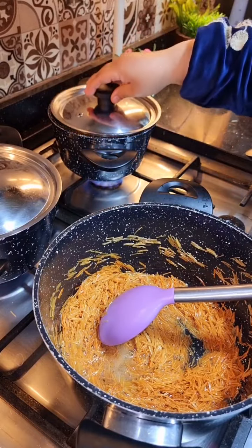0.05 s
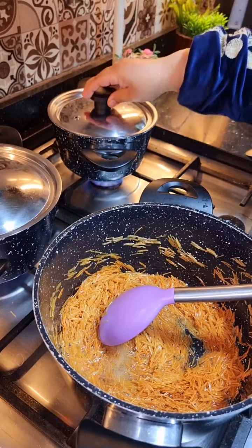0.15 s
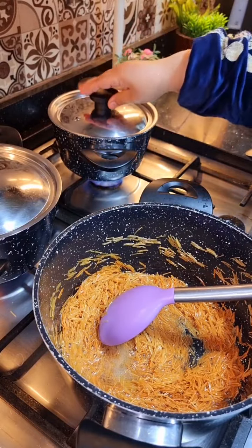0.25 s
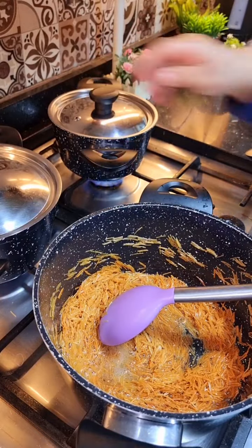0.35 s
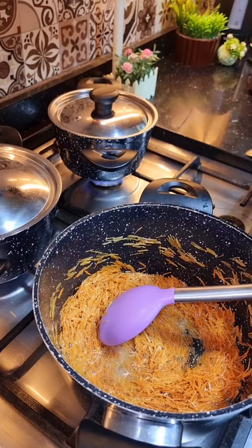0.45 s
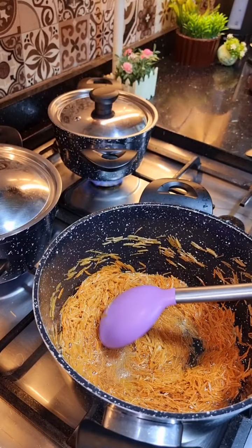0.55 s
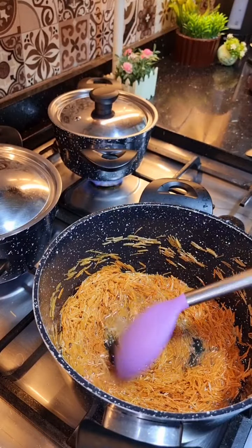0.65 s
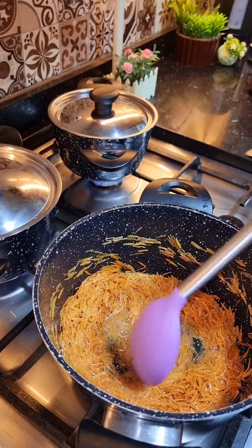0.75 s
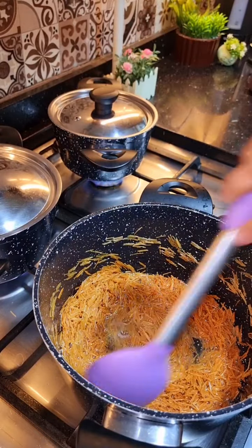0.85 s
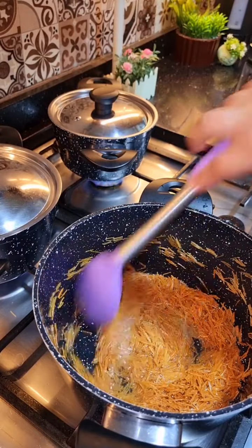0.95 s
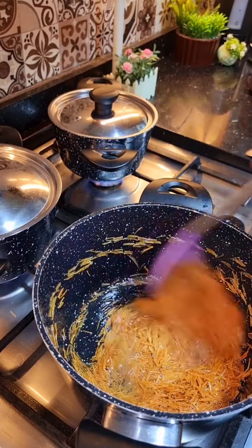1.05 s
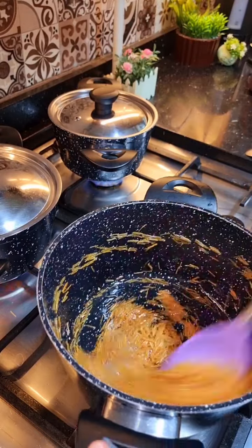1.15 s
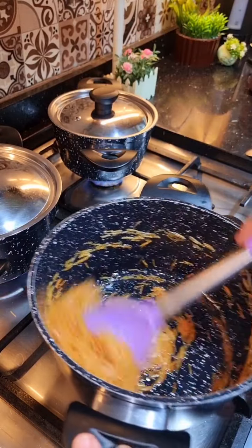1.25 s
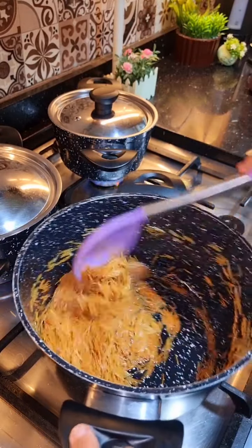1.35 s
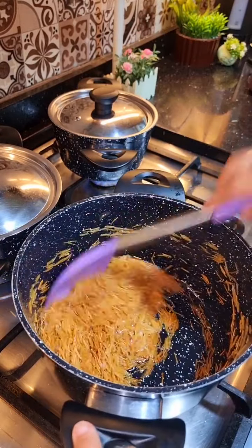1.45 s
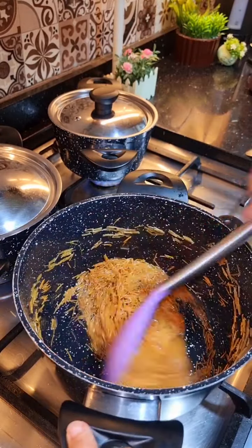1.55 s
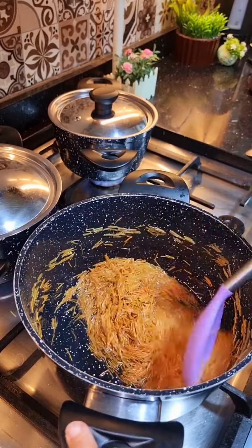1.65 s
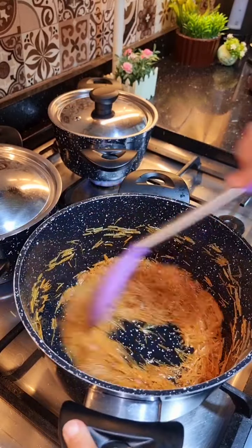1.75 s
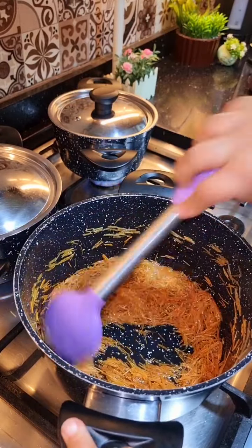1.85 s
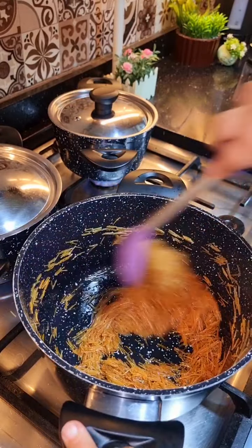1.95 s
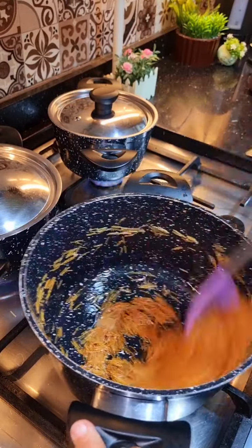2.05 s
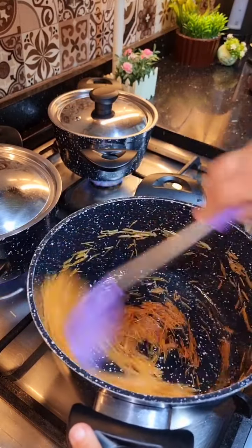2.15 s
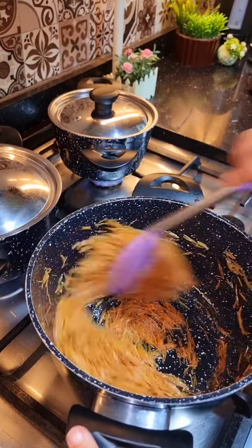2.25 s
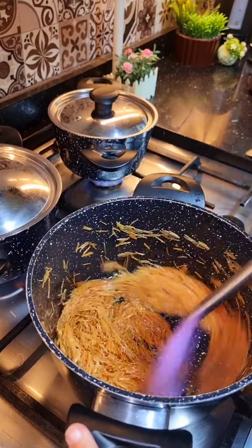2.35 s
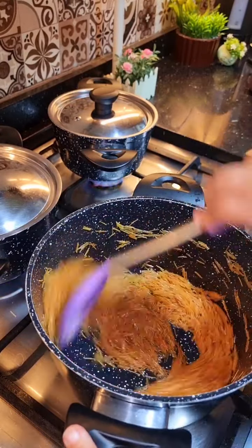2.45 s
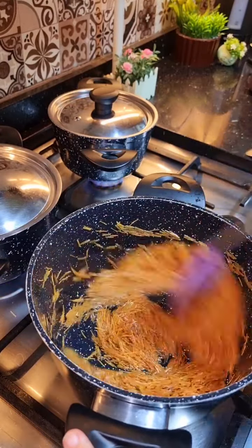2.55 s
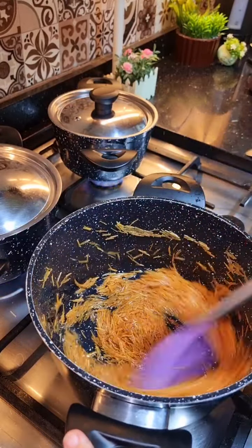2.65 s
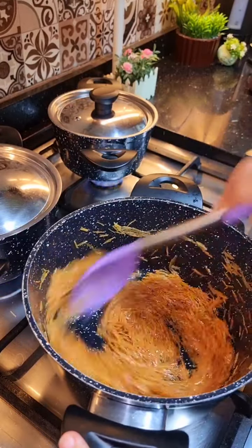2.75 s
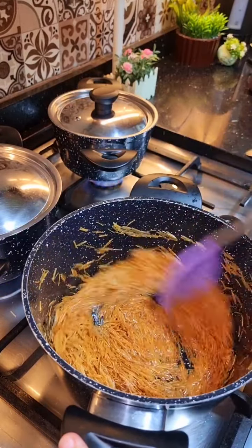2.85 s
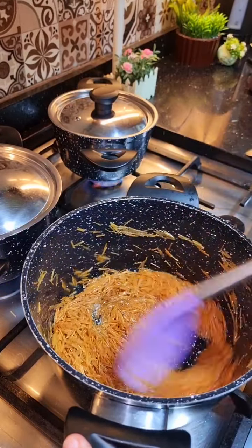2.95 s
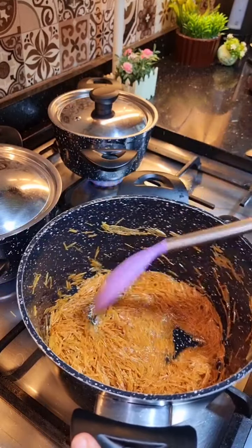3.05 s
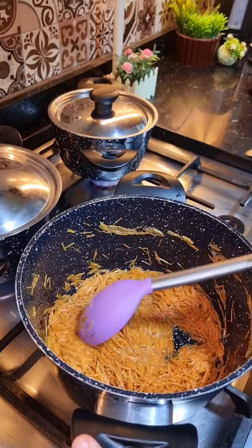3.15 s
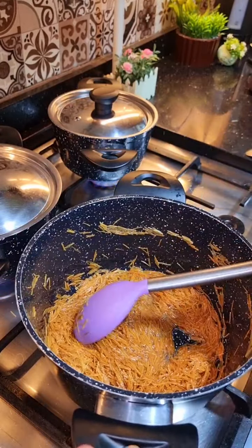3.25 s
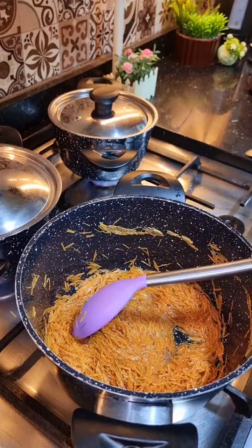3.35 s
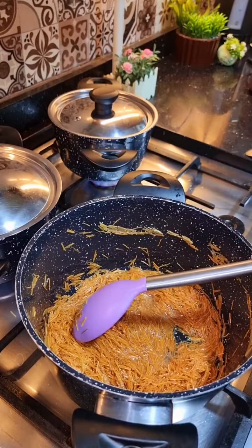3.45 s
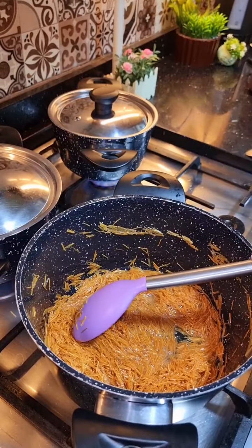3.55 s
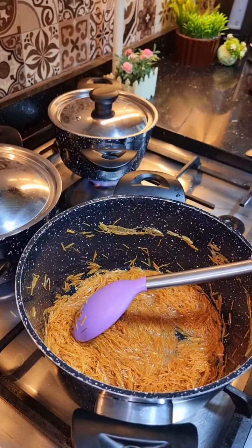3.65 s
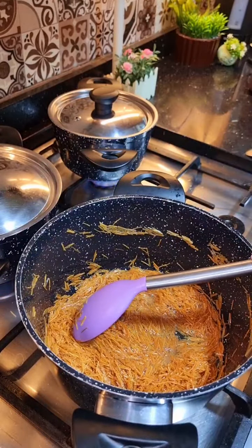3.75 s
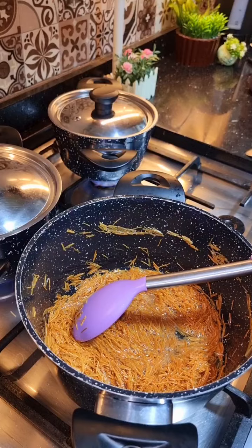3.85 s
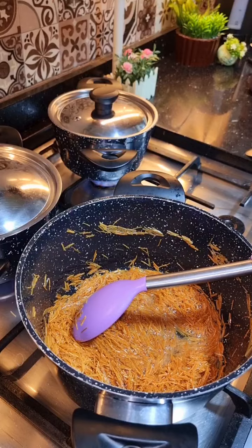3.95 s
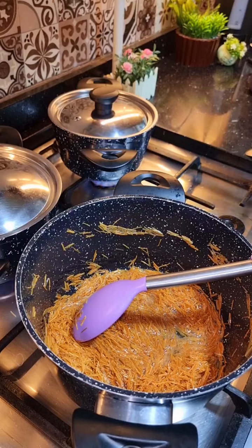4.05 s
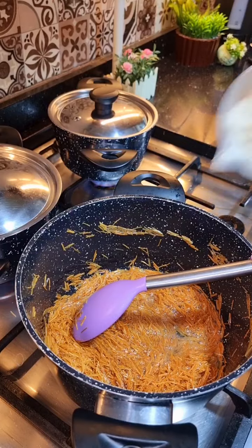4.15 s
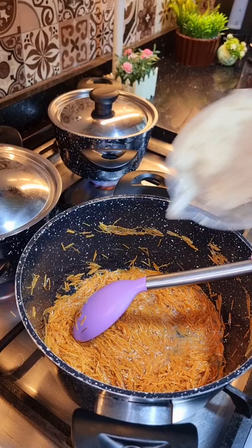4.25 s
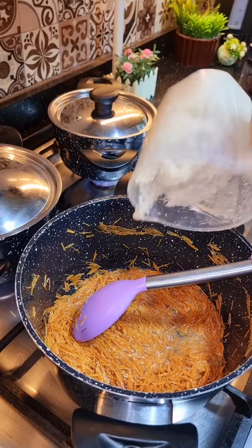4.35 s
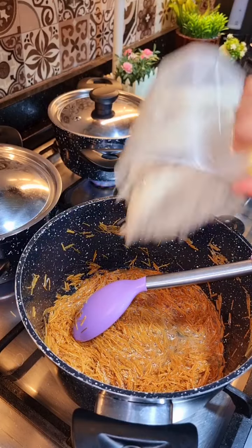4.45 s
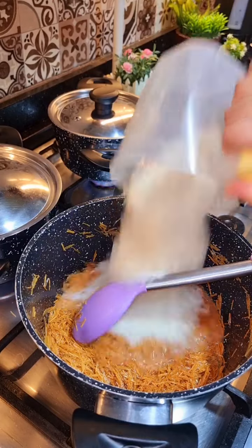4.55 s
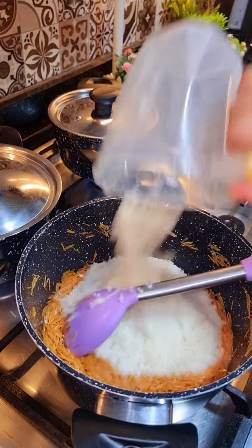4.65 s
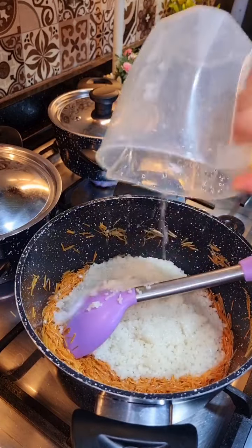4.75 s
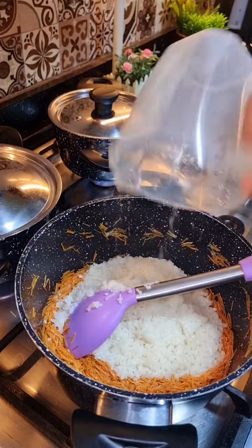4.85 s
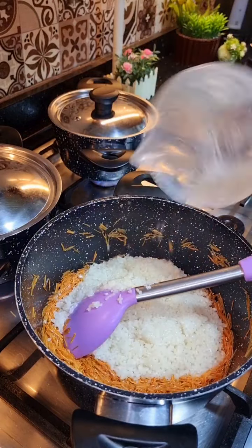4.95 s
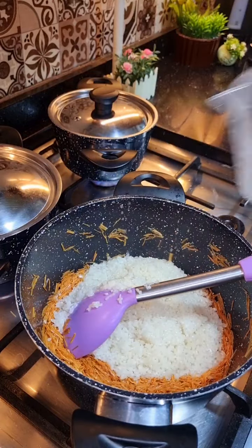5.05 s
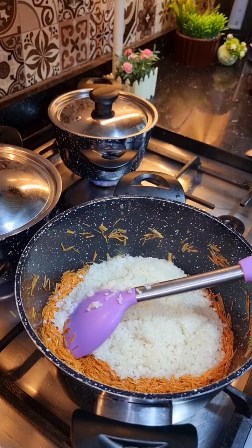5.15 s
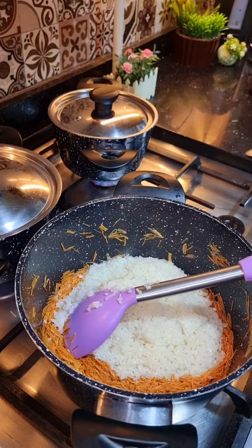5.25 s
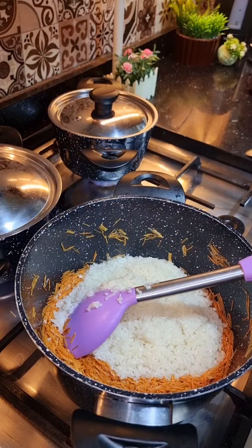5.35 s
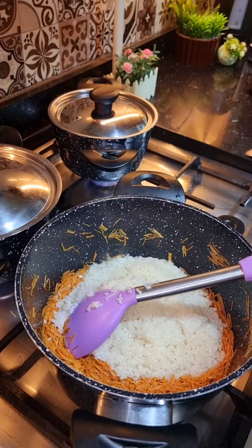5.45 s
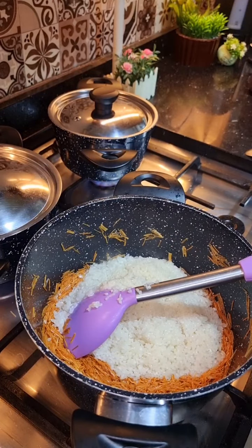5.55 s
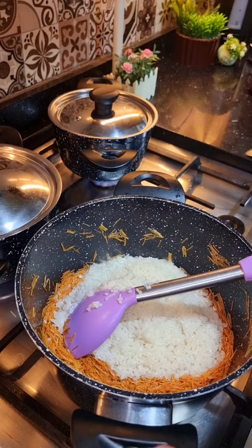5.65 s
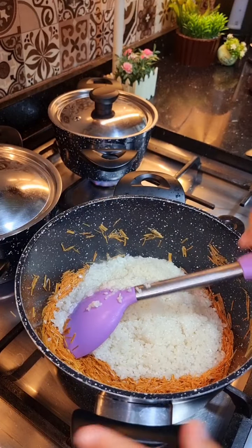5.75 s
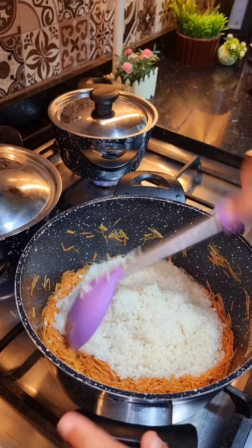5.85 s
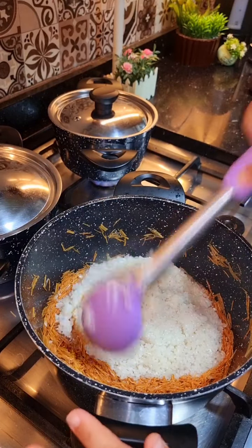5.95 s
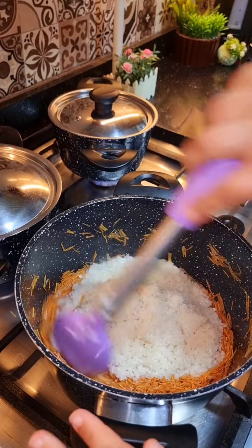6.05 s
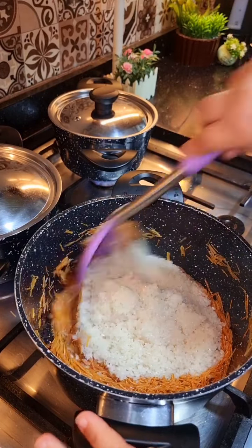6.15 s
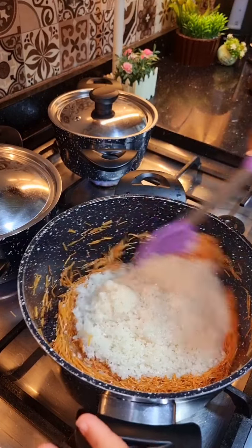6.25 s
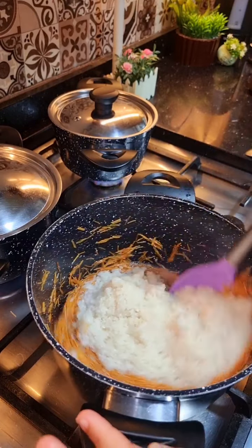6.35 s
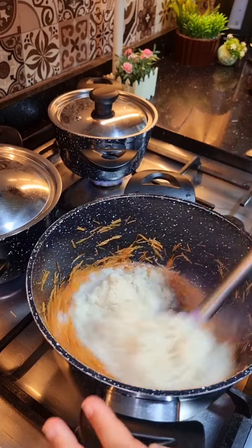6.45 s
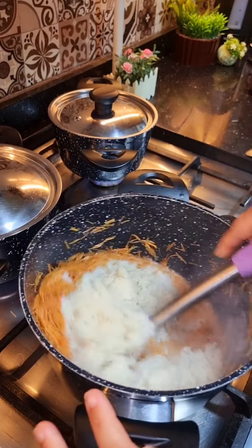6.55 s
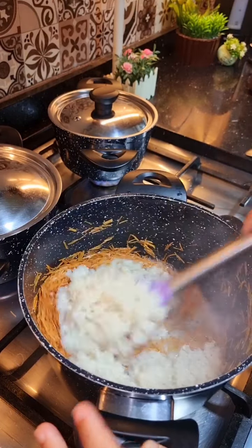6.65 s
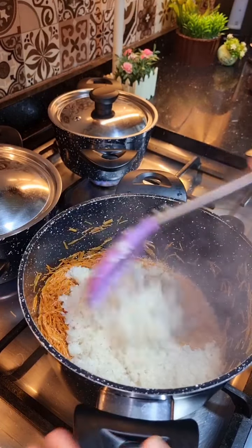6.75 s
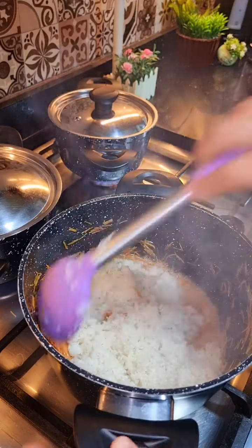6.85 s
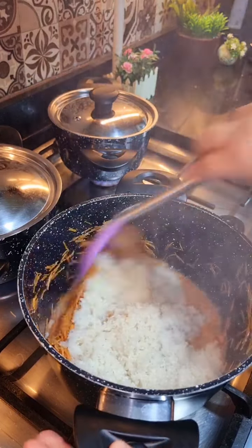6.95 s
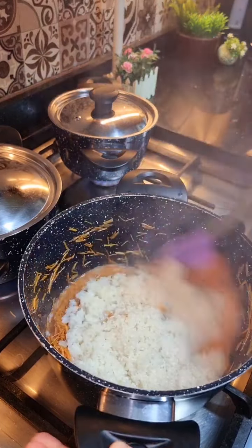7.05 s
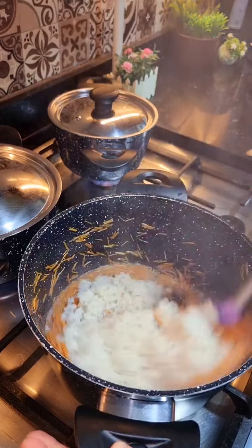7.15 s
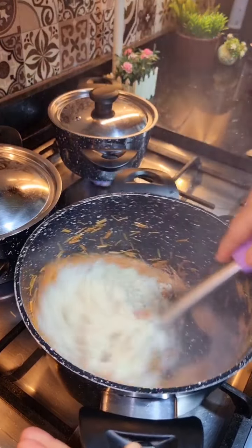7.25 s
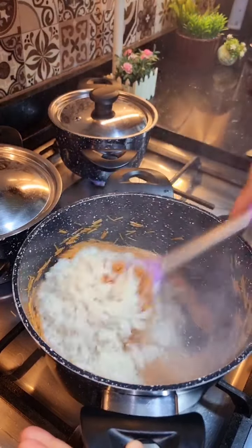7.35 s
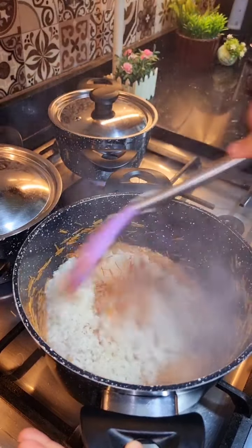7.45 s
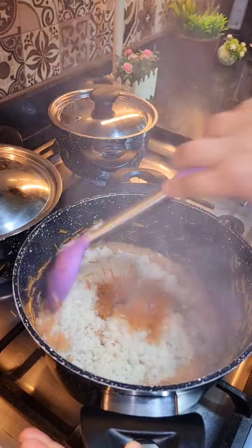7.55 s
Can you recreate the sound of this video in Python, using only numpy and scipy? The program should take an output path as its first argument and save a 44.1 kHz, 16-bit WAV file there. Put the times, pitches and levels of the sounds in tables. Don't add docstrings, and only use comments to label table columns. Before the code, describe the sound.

Close stereo pickup of a deep pan on a stove, short room reverberation and quiet low fan rumble. First a bright lid clatter, then a hard steel tap, light scrapes and swishing sizzles as noodles are turned. The spoon rests and fat spits in fine, dry snaps. Rice is tipped in, flashing into dense sizzle; a plastic jug is set down with a hollow knock, then stirring swells the steamy roar.

```python
import sys
import numpy as np
from scipy import signal
from scipy.fft import rfft, irfft, next_fast_len
from scipy.io import wavfile
from scipy.ndimage import uniform_filter1d, map_coordinates

SR = 44100
rng = np.random.default_rng(int(sys.argv[2]) if len(sys.argv) > 2 else 0)


def transcribe(u):
    v = np.clip(np.atleast_2d(u).T, -1, 1)
    q = np.round(v * 32767).astype(np.int16)
    wavfile.write(sys.argv[1], SR, q)


def voltage_ratio(decibels):
    exponent = np.asarray(decibels, float) / 20
    return 10 ** exponent


N = 335160


def unit(x):
    return x / np.sqrt(np.mean(x ** 2) + 1e-20)


def along(points, hz):
    f, v = np.transpose(points)
    return np.interp(np.log(hz + 1), np.log(f + 1), v)


def curves(rows):
    s, *cols = np.transpose(rows)
    return [np.interp(np.arange(N) / SR, s, c) for c in cols]


def wobble(rate):
    knots = rng.standard_normal(int(N * rate / SR) + 4)
    return map_coordinates(knots, [np.arange(N) * rate / SR])


def filtered(x, response):
    m = next_fast_len(N + SR // 2)
    return irfft(rfft(x, m) * response(np.fft.rfftfreq(m, 1 / SR)), m)[..., :N]


def mode(hz, width_hz):
    return lambda f: 1j * f * width_hz / (hz * hz - f * f + 1j * f * width_hz)


def patchy(patchy_db):
    z = signal.stft(rng.standard_normal((2, N)), nperseg=256)[2]
    field = uniform_filter1d(rng.standard_normal(z.shape[1:]), size=6, axis=0)
    field = uniform_filter1d(field, size=8, axis=1)
    return unit(signal.istft(z * voltage_ratio(patchy_db * unit(field)), nperseg=256)[1][:, :N])


def ring(modes, scatter_db, length, rough_hz, attack=0.00079):
    t = np.arange(round(length * SR)) / SR
    hz, db, t60 = np.transpose(modes)[:, :, None]
    luck = rng.standard_normal((2, len(modes), 1))
    steps = rng.standard_normal((2, len(modes), len(t)))
    wander = np.cumsum(steps, axis=2) * np.sqrt(2 * np.pi * abs(rough_hz) / SR)
    wander[1] += np.pi / 2 * np.sign(luck[0]) + .4 * luck[1]
    decay = voltage_ratio(db + scatter_db * luck - 60 * t / t60)
    tones = decay * np.sin(2 * np.pi * hz * t + wander)
    return np.sum(tones, axis=1) * (1 - np.exp(-t / attack))


def puff(t60, length):
    t = np.arange(round(length * SR)) / SR
    return voltage_ratio(-60 * t / t60) * rng.standard_normal((2, len(t)))


def empty_track():
    return np.zeros((2, N + SR))


def add(track, s, sound):
    track[:, round(s * SR):][:, :sound.shape[1]] += sound


# f/Hz, density/dB per Hz
RUMBLE_COLOUR = [(40, -12), (70, -2.5), (120, -5.5), (200, -8), (260, -17.5), (440, -8), (520, -14.5),
                 (1050, -16.5), (2500, -25.5), (5000, -40), (10000, -25.5), (16000, -50)]
# f/Hz, width/Hz, level over the rumble/dB
FAN_LINES = [(89.4, 12, 2.5), (149, 19, 10.5), (369, 5.4, -8)]
# t/s, drone level/dB, burner rise/dB
BODY_SWELL = [
    (0.0, -50, 3.5),
    (0.23, -59, 0.7),
    (3.0, -69, 1.5),
    (3.75, -73, 0),
    (7.2, -47, 4),
    (7.6, -71, 1.5),
]


def rumble():
    drone_db, rise_db = curves(BODY_SWELL)

    def colour(f):
        lines = sum(voltage_ratio(db) * abs(mode(hz, width)(f)) for hz, width, db in FAN_LINES)
        return voltage_ratio(along(RUMBLE_COLOUR, f)) * (1 + lines)

    fan = unit(filtered(patchy(patchy_db=1.0), colour))
    body = unit(filtered(patchy(patchy_db=-13.0), lambda f: mode(400, 170)(f) ** 2))
    return voltage_ratio(-48 + rise_db + 0.16 * wobble(2.8)) * fan + voltage_ratio(drone_db - 21.0) * body


# t/s, peak level/dB, pot thud/dB
LID_CONTACTS = [
    (0.0084, -11.5, -21),
    (0.0154, -14.5, -21),
    (0.0263, -9.5, -21),
    (0.0454, -14, -13),
    (0.065, -25, -6),
    (0.1054, 3, -21),
    (0.117, -19, -5),
    (0.13, -8, -31),
    (0.136, -12, -17),
    (0.1461, -13, -18),
]
# f/Hz, level/dB, t60/s
EDGE_GLASS = [(740, -10, 0.22), (2075, 0, .14), (2920, -15, .15), (3210, -10.5, 0.21), (3750, -7, 0.16),
              (3950, 0.5, .14), (3970, -5, 0.17), (4710, -4, .26), (5340, -10, .12), (5830, -12, 0.19),
              (6584, -19, .14), (7000, -13, .12), (8349, -16, .13), (8818, -12.5, 0.18)]
# f/Hz, level/dB, t60/s
FLAT_GLASS = [(1875, -6.5, 0.19), (2080, -4.5, 0.061), (3250, -19, 0.17), (3690, -7.5, .12),
              (3980, -2, 0.15), (4140, -2, .19), (4710, -6, .27), (5320, -13, 0.14), (5760, -18, 0.2),
              (6840, -8, .06), (7120, -14, .14), (8220, -11, 0.11), (8800, -13.5, 0.16), (9900, -15, .09)]
# f/Hz, level/dB, t60/s
STEEL_BAND = [(10530, -21, .13), (11350, -21, .11), (11700, -20.5, 0.19), (12400, -24, .12),
              (13900, -23.5, .13), (14600, -28, .11)]
# f/Hz, level/dB, t60/s
SMALL_POT = [(195, -5, 0.12), (293, -13, 0.12), (375, -3.5, 0.25), (476, -15, 0.21), (603, -0.5, 0.15),
             (743, 9.5, 0.079), (793, -14, 0.19), (1097, 4, 0.11)]


def lid():
    track = empty_track()
    for s, db, thud_db in LID_CONTACTS:
        struck = FLAT_GLASS if s > .1 else EDGE_GLASS
        glass = ring(struck + STEEL_BAND, scatter_db=2.0, length=.35, rough_hz=30, attack=.0008)
        rattle = voltage_ratio(-7) * puff(t60=0.04, length=.35) + voltage_ratio(-15.5) * puff(t60=0.28, length=.35)
        glass += uniform_filter1d(rattle, size=3)
        pot = ring(SMALL_POT, scatter_db=4.5, length=.35, rough_hz=22)
        add(track, s, voltage_ratio(db - 13.0) * (glass + voltage_ratio(thud_db + 6) * pot))
    return track[:, :N]


# t/s, sizzle level/dB
SIMMER_LEVEL = [
    (.3, -65.5),
    (.8, -73),
    (2.6, -66),
    (3.1, -57),
    (3.4, -54.5),
    (4.0, -58.5),
    (4.45, -59),
]
# t/s, sizzle level/dB
WET_RICE = [(4.452, -58), (4.474, -36), (4.51, -35), (4.6, -29.5), (4.68, -30), (4.78, -33), (5.045, -31),
            (5.6, -33), (6.105, -33), (6.135, -27.5), (6.165, -26), (6.19, -22.5), (6.3, -24),
            (6.408, -21.5), (6.6, -24), (6.826, -24.5), (6.99, -24), (7.154, -22), (7.35, -22.5),
            (7.6, -24)]
# start t/s, rise/s, sizzle level/dB, fading/dB per s, steam/dB
SPOON_STROKES = [
    (.53, 0.014, -54, 46, 4.5),
    (.74, 0.082, -44, 90, -1),
    (.82, 0.065, -38.5, 15.5, 2.5),
    (1.32, 0.082, -43.5, 86.5, 11),
    (1.59, 0.062, -38.5, 146.5, 3),
    (1.78, 0.1, -39.5, 12.5, 6),
    (1.95, 0.11, -37, 33, 4.5),
    (2.27, 0.054, -39, 32, 4),
    (2.42, 0.053, -37, 43.5, 7),
    (2.69, 0.048, -35.5, 41, -1),
]


def sizzle():
    t = np.arange(N) / SR
    simmer_db, = curves(SIMMER_LEVEL)
    wet_db, = curves(WET_RICE)
    power = voltage_ratio(simmer_db) ** 2 + voltage_ratio(wet_db) ** 2 * (t > WET_RICE[0][0])
    steam = power.copy()
    for s, rise, db, fade_db, steam_db in SPOON_STROKES:
        after = t - s - rise
        shape_db = np.where(after < 0, 19 * after / rise, -fade_db * after)
        stroke = voltage_ratio(db + shape_db) ** 2 * (t > s)
        power = power + stroke
        steam = steam + stroke * voltage_ratio(steam_db) ** 2
    return np.sqrt(power), np.sqrt(steam)


# from t/s, steam/dB, upper pan air/dB, lower pan air/dB, spit share/0-1
PAN_STATES = [
    (0, -1.5, -10, -16.5, 0.08),
    (2.8, 1, -8.5, -22, 0.7),
    (2.97, -1, -8, -11, 0.5),
    (3.62, -1, -10, -12, 0.5),
    (4.47, 2.5, -9, -16, 0.04),
    (6.12, -2.5, -7, -16.5, 0.08),
    (6.33, 0, -7.5, -12.5, 0),
    (6.98, 0.5, -7, -13.5, 0),
    (7.35, 0.5, -7.5, -13.5, 0.03),
]


def states():
    s, *cols = np.transpose(PAN_STATES)
    now = np.searchsorted(s[1:], np.arange(N) / SR)
    change_s = .08
    return [uniform_filter1d(c[now], size=round(change_s * SR)) for c in cols]


def bubbles(rate, spread_db, t60, share):
    luck = rng.random((2, N))
    sizes = (luck[0] < rate / SR) * voltage_ratio(-spread_db * np.log(1 - .96 * luck[1]))
    bursts = unit(signal.lfilter([1], [1, -voltage_ratio(-60 / (t60 * SR))], sizes))
    gain = np.sqrt(1 - share) + np.sqrt(share) * bursts
    return gain / np.sqrt(uniform_filter1d(gain ** 2, size=SR // 5))


# t/s, favoured f/Hz
FOOD_HOLLOW = [(0, 1600), (0.9, 1560), (1.25, 1480), (1.6, 1780), (4.47, 1800), (4.6, 1720), (4.8, 1660),
               (6.1, 1750), (6.19, 1820), (6.33, 1500), (6.45, 1750), (6.56, 1920), (6.7, 1650),
               (6.98, 1930), (7.12, 1580), (7.24, 1650), (7.38, 1920), (7.6, 1940)]


def shifting(noise, rows, shift_db, focus_db):
    pitch, = curves(FOOD_HOLLOW)
    total = 0
    for k, (hz, width, db) in enumerate(rows):
        octaves_off = np.minimum(abs(np.log2(hz / pitch)), .22)
        gain = voltage_ratio(db + shift_db * wobble(5) - focus_db * octaves_off)
        total = total + gain * (-1) ** k * filtered(noise, mode(hz, width))
    return unit(total)


# f/Hz, density/dB per Hz
BUBBLE_FIZZ = [(1500, -69), (2150, -13.5), (2450, -9), (2750, -2.5), (3050, -6), (3450, -3), (4000, -3.5),
               (4450, -1.5), (5200, -4.5), (6500, -5.5), (8500, -11), (11000, -13.5), (16000, -56)]
# f/Hz, density/dB per Hz
STEAM_HISS = [(3000, -56), (5000, -2.5), (6500, -3.5), (7500, -5), (11400, -1.5), (14900, -5),
              (16000, -3.5)]
# f/Hz, width/Hz, level/dB
ACROSS_PAN = [(1202, 120, 2.5), (1486, 160, 2), (1752, 137, 1), (1910, 110, 1.5), (2240, 620, -2)]
# f/Hz, width/Hz, level/dB
PAN_DEPTH = [(250, 260, -16.5), (456, 56, -6.5), (601, 84, -5.5), (754, 58, -0.5), (882, 115, -0.5)]


def frying():
    strength, steam = sizzle()
    steam_db, upper_db, lower_db, spit = states()
    spit = np.clip(spit, 0, 1)
    surge_db = 0.98 * wobble(10) + 0.12 * wobble(27)
    wide = bubbles(rate=370, spread_db=4.5, t60=0.0022, share=.4 * spit)

    def own(t60):
        bursts = bubbles(rate=340, spread_db=5.5, t60=t60, share=.7 * spit)
        return wide * bursts * patchy(patchy_db=1.14)

    fizz = unit(filtered(own(t60=0.028), lambda f: voltage_ratio(along(BUBBLE_FIZZ, f))))
    hiss = unit(filtered(own(t60=0.0037), lambda f: voltage_ratio(along(STEAM_HISS, f))))
    upper = shifting(filtered(own(t60=0.0076), mode(1930, 1500)), ACROSS_PAN, shift_db=2.0, focus_db=23.5)
    lower = shifting(filtered(own(t60=0.017), mode(774, 760)), PAN_DEPTH, shift_db=1.25, focus_db=0)
    bubbling = strength * (fizz + voltage_ratio(upper_db + 2.5) * upper + voltage_ratio(lower_db) * lower)
    steaming = steam * voltage_ratio(steam_db - 0.4) * hiss
    return voltage_ratio(surge_db + 2.5) * (bubbling + steaming)


# t/s, peak level/dB
WORKTOP_BUMPS = [(0.539, -43), (0.59, -42.5), (1.649, -41.5), (2.51, -42.5), (2.928, -41), (3.17, -38),
                 (3.228, -41), (4.599, -42.5), (6.1, -39), (6.198, -43), (6.972, -40)]


def bumps():
    track = empty_track()
    for s, db in WORKTOP_BUMPS:
        add(track, s, voltage_ratio(db + 11) * ring([(88, 0, 0.24)], scatter_db=-0.5, length=.4, rough_hz=9.5, attack=0.01))
    return track[:, :N]


# t/s, peak level/dB
PUT_DOWN = [
    (0.542, -23),
    (5.382, -14),
]
# f/Hz, level/dB, t60/s
PAN_GRATE = [(315, -1, 0.16), (449, -3, 0.124), (858, 1, 0.23), (1060, 4.5, 0.091), (1560, -15, 0.32),
             (1685, -10, 0.17), (2560, -9, 0.1), (3720, -20, .06), (5250, -6.5, 0.044), (5900, -11, 0.098)]
# f/Hz, level/dB, t60/s
PLASTIC_JUG = [(300, -30, .12), (417, -26, 0.1), (650, 7, 0.03), (708, -1, 0.14), (775, 0, 0.23),
               (878, 3, 0.19), (957, 3, 0.22), (1360, -5, 0.046)]


def set_down():
    track = empty_track()
    for (s, db), body in zip(PUT_DOWN, (PAN_GRATE, PLASTIC_JUG)):
        blow = ring(body, scatter_db=1.5, length=.3, rough_hz=20, attack=.0005)
        add(track, s, voltage_ratio(db - 8) * (blow + voltage_ratio(-20) * puff(t60=0.025, length=.3)))
    return track[:, :N]


# t/s, length/s, f/Hz, level/dB
SPOON_DRAGS = [
    (.71, 0.086, 1190, -58),
    (0.866, 0.28, 1486, -48.5),
    (1.363, 0.096, 369, -53),
    (1.62, 0.086, 1900, -54),
    (2.019, 0.44, 1813, -55),
    (2.241, 0.2, 854, -49),
    (2.625, .1, 855, -48.5),
    (4.252, 0.039, 1450, -44),
]


def scrapes():
    track = empty_track()
    for s, length, hz, db in SPOON_DRAGS:
        floor = [(hz, 0, 9), (0.97 * hz, -3, 9), (0.99 * hz, -3, 9)]
        drag = ring(floor, scatter_db=3.0, length=length, rough_hz=66)
        swell = np.sin(np.linspace(0, np.pi, drag.shape[1])) ** 0.34
        add(track, s, voltage_ratio(db) * drag * swell)
    return track[:, :N]


# t/s, peak level/dB, share of the free ring time
RIM_TAPS = [
    (0.816, -30, 0.2),
    (0.837, -7.5, 0.1),
    (0.841, -9, 0.092),
    (0.856, -24, .15),
    (4.139, -15, 0.05),
    (4.141, -22.5, 0.9),
    (4.196, -33, 1),
]
# f/Hz, level/dB, t60/s
STEEL_HANDLE = [(420, -10, 0.11), (1245, 0.5, 0.096), (1450, -11, 0.21), (1800, -7, 0.067),
                (2800, -6.5, 0.16), (2940, 1, 0.15), (4200, 2.5, 0.15), (4400, -5, 0.077), (5450, -8, .08)]


def rim_taps():
    track = empty_track()
    for s, db, free in RIM_TAPS:
        held = [(hz, level, free * t60) for hz, level, t60 in STEEL_HANDLE]
        steel = ring(held, scatter_db=2.0, length=.3, rough_hz=70)
        add(track, s, voltage_ratio(db - 12.5) * (steel + voltage_ratio(-18) * puff(t60=0.061, length=.3)))
    return track[:, :N]


# t/s, peak level/dB, snap f/Hz
SPOON_FLICKS = [(0.838, -20, 4120), (1.4117, -19.5, 3817), (1.636, -32, 3540), (1.812, -20.5, 3660),
                (2.4592, -14, 6270), (2.7143, -25, 3150), (3.8661, -29, 7830), (3.8908, -29.5, 3530),
                (4.04, -46, 4640), (4.139, -30, 4300), (4.253, -37, 2800), (4.3056, -28, 9140)]
# t/s, peak level/dB, snap f/Hz
FAT_TICKS = [(2.7596, -16, 4590), (2.7854, -20.5, 4320), (2.8874, -21.5, 4740), (2.918, -23, 5560),
             (3.016, -21, 6740), (3.1064, -34, 4450), (3.1464, -36, 8450), (3.1704, -35, 4550),
             (3.1914, -35, 4470), (3.275, -30, 4500), (3.3564, -32, 3510), (3.4517, -29, 3560),
             (3.5714, -25, 10400), (3.6034, -38, 6100), (3.6391, -32, 5990), (3.6874, -29, 4710),
             (3.727, -26, 4520), (3.7974, -37, 8790), (3.8134, -32, 10700), (3.8778, -32, 3530),
             (3.9265, -31, 6820), (3.9659, -35, 7730), (3.9734, -40, 3510), (4.0721, -29, 8280),
             (4.0844, -33, 10200), (4.2274, -38, 4180), (4.2414, -38, 4610), (4.3754, -44, 7350)]
# t/s, peak level/dB,
# snap f/Hz, pan air/dB
FAT_SPITS = [(2.776, -14.5, 4140, -35), (2.8293, -29, 4400, -22), (2.852, -15, 4550, -22),
             (2.8728, -12, 10900, -21), (2.8841, -19, 2680, -2), (2.8943, -15.5, 2630, -22),
             (2.8645, -19, 2670, -2), (2.9769, -17.5, 4460, -10.5), (3.001, -24, 4700, -11),
             (3.0486, -19.5, 4400, -16.5), (3.066, -16, 4480, -20.5), (3.1323, -24.5, 4540, -21),
             (3.211, -25, 4350, -13), (3.2185, -23, 4430, -17), (3.2955, -23, 4360, -22),
             (3.3302, -24, 4940, -7), (3.391, -27, 2550, -4.5), (3.397, -22, 4480, -8),
             (3.4339, -28, 5420, -18), (3.4627, -22, 3580, -9.5), (3.4813, -22.5, 3100, -18),
             (3.5212, -21.5, 4930, -19), (3.5406, -25, 4440, -10.5), (3.5804, -29, 7490, -31),
             (3.6635, -18, 5480, -29), (3.68, -22.5, 6820, -23), (3.7324, -23.5, 4680, -21),
             (3.791, -28, 8780, -30), (4.0525, -25, 4800, -23), (4.3423, -24, 5600, -16)]


def spits():
    track = empty_track()
    rows = [(s, db, hz, air_db + 8.5) for s, db, hz, air_db in FAT_SPITS]
    rows += [(*row, -18) for row in SPOON_FLICKS]
    rows += [(*row, -11.5) for row in FAT_TICKS]
    for s, db, hz, air_db in rows:
        tick = voltage_ratio(-19) * np.gradient(puff(t60=.0012, length=.05), axis=1)
        snap = ring([(hz, 0, 9 / hz), (1.4 * hz, -6, 6 / hz)], scatter_db=1.5, length=.05, rough_hz=60, attack=.0001)
        cloud = [(hz, -23, .035), (1.12 * hz, -24, .035), (1.6 * hz, -27, .03)]
        spray = ring(cloud, scatter_db=4, length=.05, rough_hz=510)
        air = ring([(1750, air_db - .5, .011)], scatter_db=1.5, length=.05, rough_hz=40, attack=0.00092)
        fine_spray = voltage_ratio(-20.5) * np.gradient(puff(t60=0.048, length=.05), axis=1)
        add(track, s, voltage_ratio(db + 5.5) * (tick + snap + spray + air + fine_spray))
    return track[:, :N]


# t/s, peak level/dB, ring f/Hz
SPOON_KNOCKS = [
    (0.865, -31.5, 369),
    (1.364, -39, 368),
    (2.509, -30.5, 420),
    (2.729, -33, 410),
    (2.923, -25.5, 332),
    (3.153, -27.5, 377),
    (3.19, -30, 250),
    (4.251, -28, 775),
    (4.481, -36, 460),
    (4.548, -22, 455),
]


def knocks():
    track = empty_track()
    t60 = 0.095
    for s, db, hz in SPOON_KNOCKS:
        cluster = [(hz, 0, t60), (0.787 * hz, -4, t60), (1.25 * hz, -4, t60),
                   (1.2 * hz, -6, 0.17 * t60), (1.9 * hz, -9, 0.65 * t60), (0.53 * hz, -6, t60)]
        body = ring(cluster, scatter_db=5.5, length=.3, rough_hz=45, attack=0.00086)
        add(track, s, voltage_ratio(db - 10.5) * (body + voltage_ratio(-4) * puff(t60=0.046, length=.3)))
    return track[:, :N]


# t/s, peak level/dB, f/Hz
DEEP_POPS = [(2.798, -28, 1810), (2.8532, -16, 1710), (2.8635, -16.5, 1770), (2.904, -26, 1800),
             (2.9164, -31, 1750), (2.9254, -22, 1760), (2.9325, -21, 1750), (3.014, -27, 1760),
             (3.0769, -32, 1750), (3.1284, -39, 1720), (3.2321, -36, 1760), (3.3607, -37, 1800),
             (3.4452, -33, 1740), (3.497, -34, 1750), (3.7589, -41, 1750), (3.9564, -41, 1610),
             (4.0396, -45, 1750), (4.342, -42, 1750), (4.4695, -32, 1750), (4.4814, -31, 1910)]


def pops():
    track = empty_track()
    for s, db, hz in DEEP_POPS:
        air = [(hz, 0, .012), (1.47 * hz, -10, .008)]
        add(track, s, voltage_ratio(db + 4) * ring(air, scatter_db=4.0, length=0.055, rough_hz=40, attack=.0004))
    return track[:, :N]


# f/Hz, t60/s
ROOM_DECAY = [(200, 0.212), (2000, 0.21), (10000, 0.14)]


def kitchen(x):
    hz, t, z = signal.stft(rng.standard_normal((2, SR // 2)), SR, nperseg=256)
    decay = voltage_ratio(-60 * t / along(ROOM_DECAY, hz)[:, None])
    tail = signal.istft(z * decay, SR, nperseg=256)[1]
    return signal.fftconvolve(x, tail / np.linalg.norm(tail[0]), axes=1)[:, :N]


# f/Hz, likeness/0-1
PORT_LIKENESS = [(100, 0.94), (350, 0.88), (600, 0.55), (850, 0.66), (1200, 0), (1750, 0.34), (2300, 0.21),
                 (4500, 0.09), (8000, 0.07), (12000, 0)]
# f/Hz, phase/rad
LEFT_LEAD = [(300, .05), (500, 0.91), (700, 1.1), (1000, 2.35), (1400, 5.4), (1750, 5), (2100, 6.35),
             (16000, 6.97)]


def ports(paths):
    def shares(f):
        turn = np.arccos(np.clip(along(PORT_LIKENESS, f), 0, 1)) / 2
        return np.array([np.cos(turn), np.sin(turn)])

    mid, side = filtered(paths, shares)
    pair = np.array([mid + side, mid - side])
    return filtered(pair, lambda f: np.exp(.5j * np.outer([1, -1], along(LEFT_LEAD, f))))


def scene():
    near = voltage_ratio([[1.5], [-6]])
    background = rumble()
    hits = near * (lid() + bumps() + set_down() + scrapes() + rim_taps() + knocks())
    fry = frying()
    spit = near * (spits() + pops())
    room = kitchen(voltage_ratio(-7.5) * hits + voltage_ratio(-8.5) * spit + voltage_ratio(-13.0) * fry)
    return ports(hits + spit + fry + room + background) * voltage_ratio([[-.4], [.4]])


def band_limit(x):
    return signal.sosfilt(signal.butter(12, 16690, fs=SR, output="sos"), x)


def record(dry):
    low_hz, top_hz = 75, 15750
    heard = filtered(dry, lambda f: (1j * f / (low_hz + 1j * f)) ** 3 / (1 + (f / top_hz) ** 120))
    heard = heard / (1 + abs(heard / .93) ** 6) ** (1 / 6)
    return band_limit(heard)


dry = scene()
out = record(dry)
transcribe(out)
```